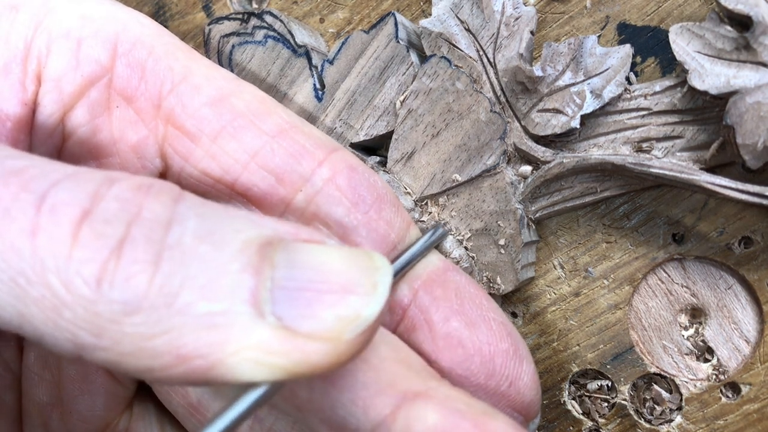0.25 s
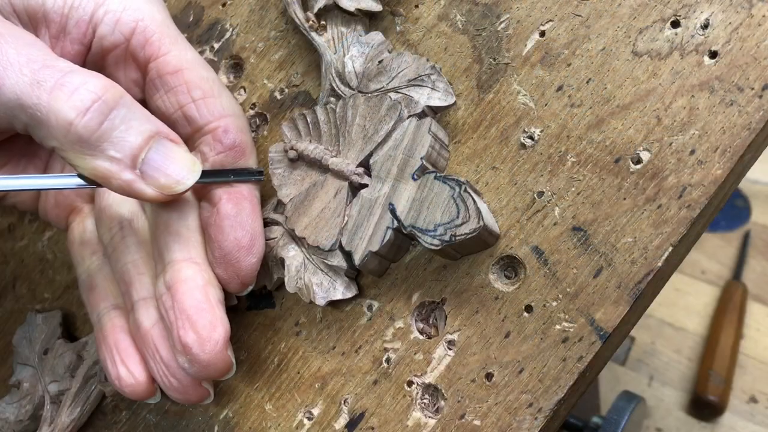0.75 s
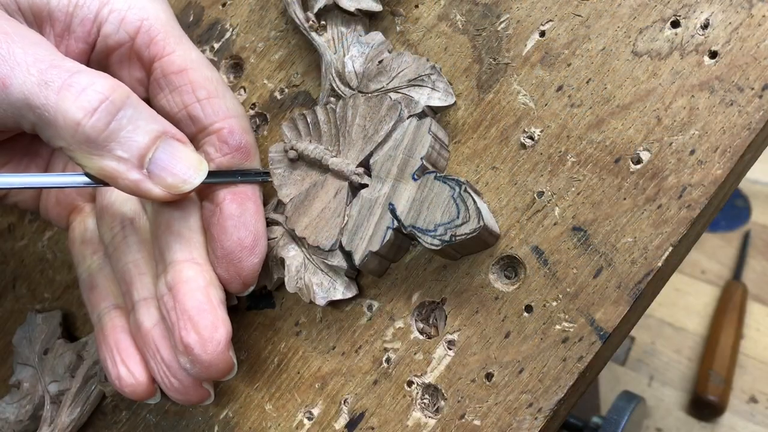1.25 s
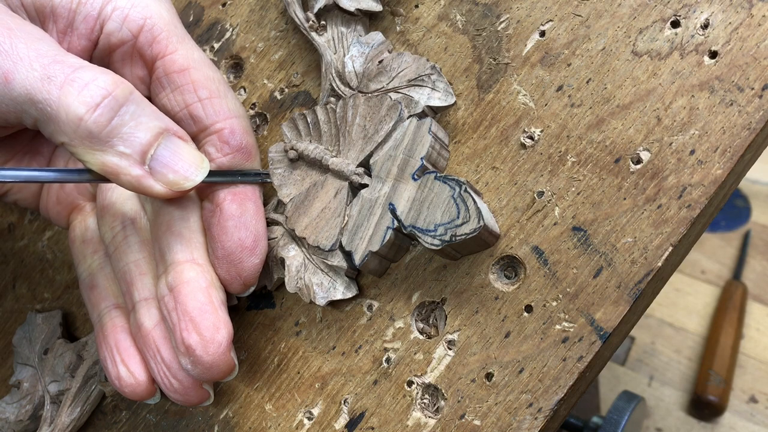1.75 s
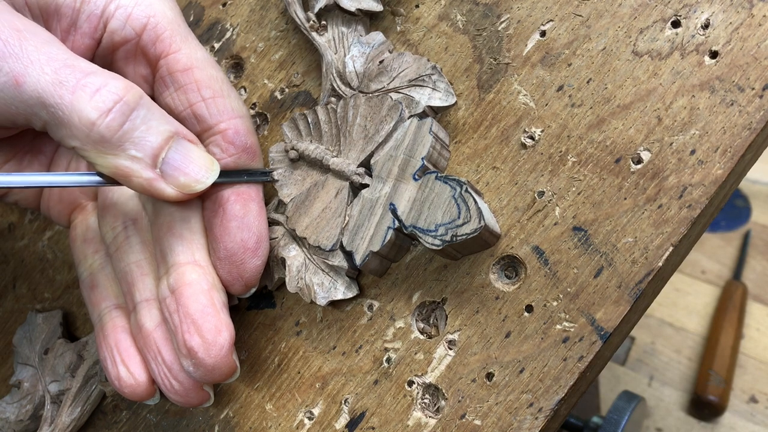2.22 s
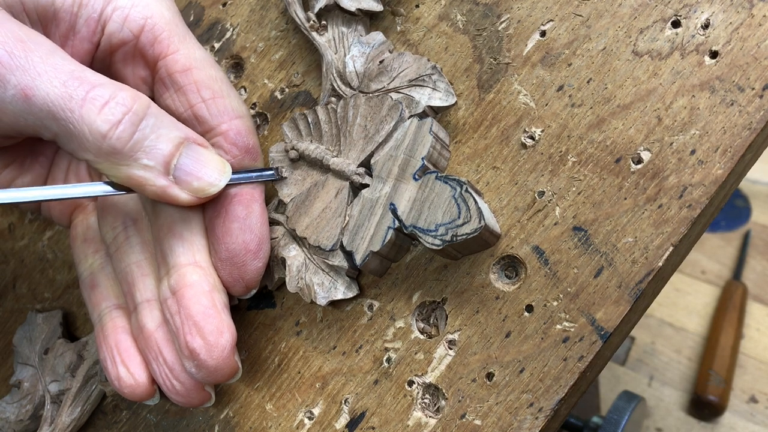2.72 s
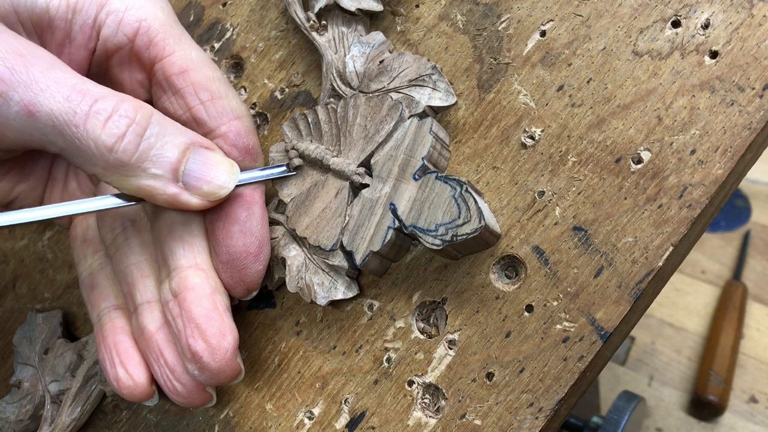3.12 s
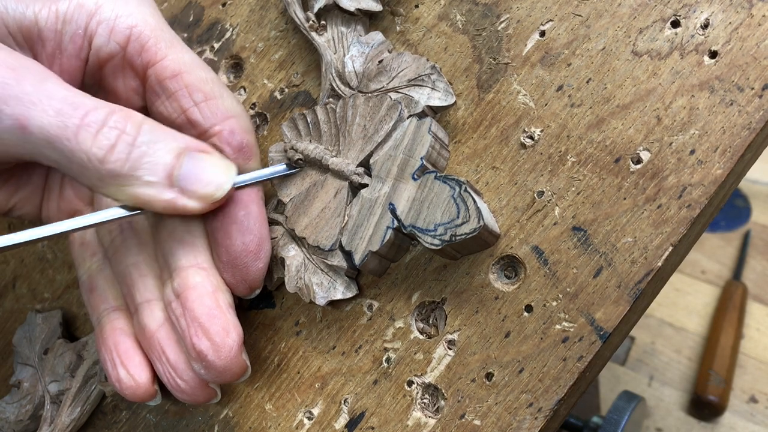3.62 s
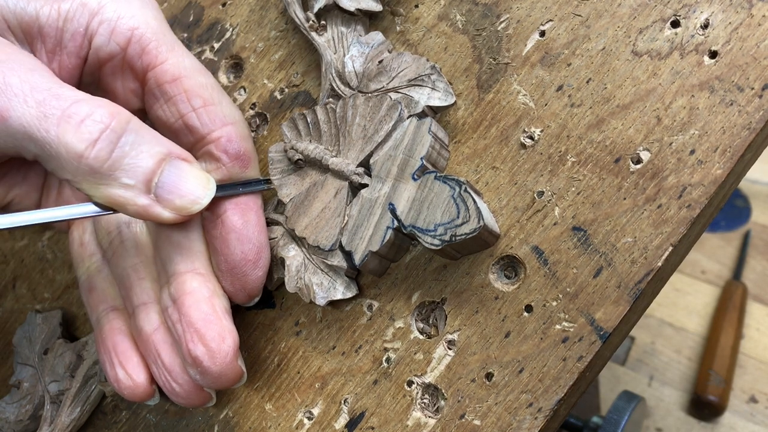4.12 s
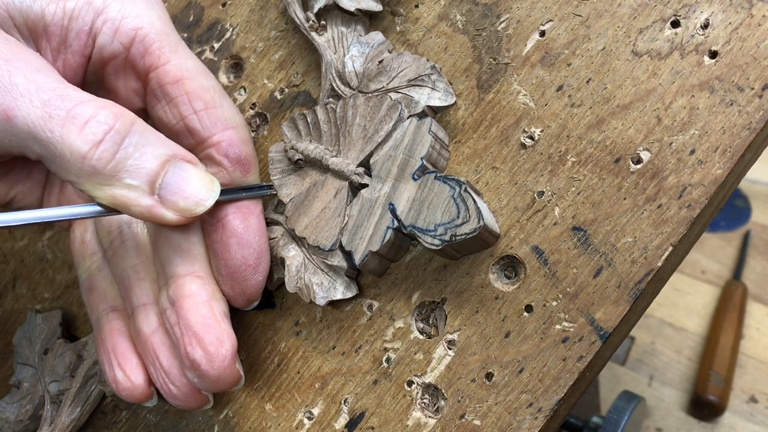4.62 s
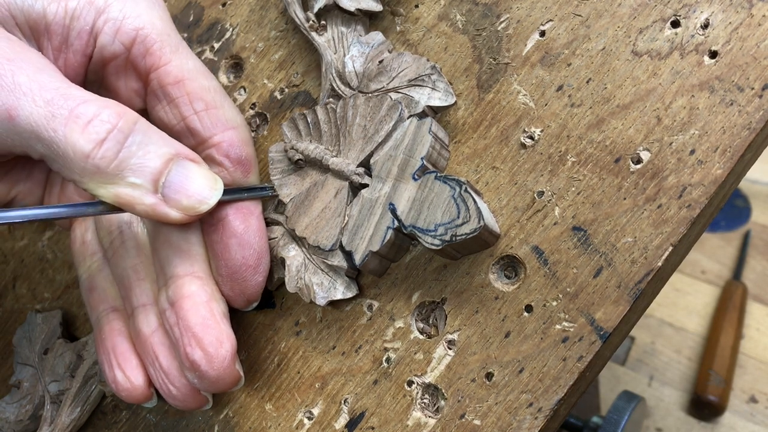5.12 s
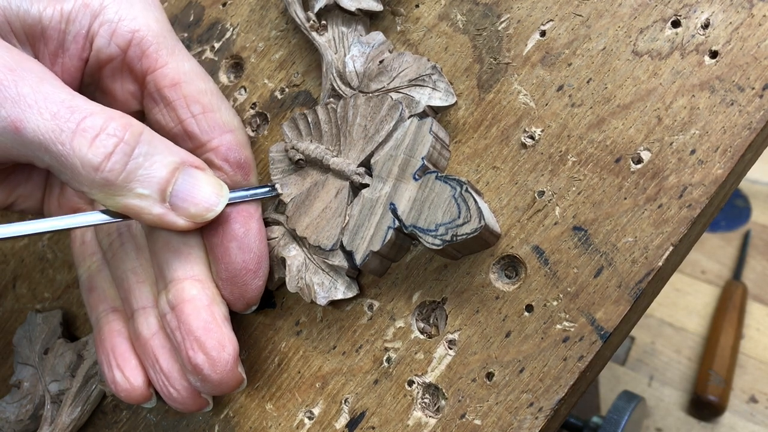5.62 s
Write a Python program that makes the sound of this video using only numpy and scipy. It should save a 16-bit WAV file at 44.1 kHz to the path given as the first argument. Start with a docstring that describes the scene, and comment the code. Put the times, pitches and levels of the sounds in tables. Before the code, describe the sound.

A small hand gouge pares a wood carving on a workbench, heard up close in a quiet workshop. A brief crackling cut opens, then after a pause comes a busy run of tiny snaps and short scrapes, with soft thumps from the bench. After another lull the piece rocks with light hollow knocks and a few more cuts follow. Faint hiss, low rumble and a soft repeating swish lie behind.

```python
"""A quiet workshop: a small gouge pares a walnut carving on a workbench, heard up close.
The edge rasps along the grain, and tiny fibre breaks crackle and ring the wood. When a chip gives way
the carving thumps the bench; between cuts the work rocks and knocks lightly.
Behind it lie a low rumble, hiss and a faint repeating swish."""
import sys
import numpy as np
from scipy import signal
from scipy.fft import rfft, irfft
from scipy.io import wavfile

SR = 44100
rng = np.random.default_rng(int(sys.argv[2]) if len(sys.argv) > 2 else 0)


def store_wav(level_fs):
    """Save 16-bit WAV to argv[1]."""
    pcm = np.round(np.clip(np.atleast_2d(level_fs), -1, 1) * 32767)
    wavfile.write(sys.argv[1], SR, pcm.T.astype(np.int16))


N = 258426
TIME = np.arange(N) / SR
TAPS = 8192
HZ = np.fft.rfftfreq(TAPS, 1 / SR)

# modes of the bench under the carving: f/Hz, level/dB, t60/s
BENCH_MODES = [(58.2, -24.5, 0.83), (75.4, -23, 1), (133.6, -11, 0.3), (177.5, -9.5, 0.14),
               (255, 0.5, 0.0775), (422, -10.5, 0.046)]
# hollow modes of the knocked work: f/Hz, level/dB, t60/s
HOLLOW_MODES = [(447.6, 0.5, 0.028), (584, -4, 0.021), (716, 1.5, 0.026), (1091, -11.5, 0.037)]


def gain_of(db):
    """Decibels to amplitude."""
    return 10 ** (np.asarray(db) / 20)


def unit_rms(x):
    """Scales to rms 1."""
    return x / np.sqrt(np.mean(x ** 2) + 1e-20)


def curve_at(points, hz):
    """Reads a curve on a log-frequency axis."""
    f, value = np.transpose(points)
    return np.interp(np.log(hz + 1), np.log(f), value)


def add(mix, s, sound):
    """Mixes a sound in at s seconds."""
    part = mix[max(round(s * SR), 0):][:len(sound)]
    part += sound[:len(part)]


def noise(colour):
    """Steady noise of a given colour, rms 1."""
    eq = gain_of(curve_at(colour, np.fft.rfftfreq(N, 1 / SR)))
    return unit_rms(irfft(rfft(rng.standard_normal(N)) * eq, N))


def ring(modes, attack_s):
    """Damped modes with a soft attack, neighbours in opposite phase."""
    t = TIME[:2 * TAPS]
    tone = sum((-1) ** k * gain_of(db - 60 * t / t60) * np.sin(2 * np.pi * hz * t)
               for k, (hz, db, t60) in enumerate(modes))
    return tone * (1 - np.exp(-(t / attack_s) ** 2))


def room_tone(air_db=-49.5, rumble_db=-58, ebb_db=5, ebbs_per_s=9):
    """The hiss of still workshop air over a low rumble that swells and ebbs."""
    # colour of the air: f/Hz, level/dB
    air_colour = [(20, -53.5), (36, -22), (56, -4), (100, 0), (160, -3), (280, -15.5), (480, -22.5),
                  (700, -24), (950, -28.5), (1900, -30.5), (3000, -32), (6000, -32.5), (10000, -38.5),
                  (15800, -39.5)]
    # the air's level dips briefly: t/s, level/dB
    air_dip = [(.2, -0.5), (.52, -3.5), (.8, 0)]
    # colour of the rumble: f/Hz, level/dB
    rumble_colour = [(60, -36), (130, 5), (190, -3.5), (300, -4), (450, -21.5), (1000, -70), (4000, -87)]
    air = gain_of(air_db + np.interp(TIME, *np.transpose(air_dip))) * noise(air_colour)
    wander = np.interp(TIME * ebbs_per_s, np.arange(TAPS), rng.uniform(-2.6, 2.4, TAPS))
    ebb = unit_rms(gain_of(ebb_db * wander))
    return air + gain_of(rumble_db) * ebb * noise(rumble_colour)


def fibre_click(tilt, contact_db=1.85):
    """One snapping fibre rings the carving; each point of contact favours other resonances."""
    # broad colour of breaking fibres: f/Hz, level/dB
    fibre_colour = [(60, -6), (200, -12), (350, -4.5), (650, -1), (900, -10), (1300, -10), (1600, -6),
                    (2800, -3.5), (4300, -10), (6500, -14.5), (9000, -21), (12000, -26), (16000, -27)]
    # resonances of carving and blade: f/Hz, width/Hz, height/dB
    resonances = [(432, 16, 9), (569, 23, 9.5), (729, 56, 12), (1085, 72, 14.5), (1466, 244, 9.5),
                  (1613, 107, 8.5), (1738, 55, 5.5), (2022, 36, 9), (2267, 29, 5), (2393, 79, 7.5),
                  (2600, 200, 7.5), (2940, 100, 1), (3223, 67, 5.5), (3910, 490, 9.5), (4420, 270, 5),
                  (4920, 430, 6), (5990, 480, 9.5), (6860, 63, 1.5), (7210, 290, 9.5), (7630, 230, 3)]
    favour = contact_db * rng.standard_normal(len(resonances))
    peaks = sum((db + extra) / (1 + (2 * (HZ - hz) / width) ** 2)
                for (hz, width, db), extra in zip(resonances, favour))
    octaves = np.log2(np.maximum(HZ, 600) / 3000)
    log_gain = np.log(gain_of(curve_at(fibre_colour, HZ) + peaks + tilt * octaves))
    # minimum phase: the wood rings only after the break
    log_spectrum = np.conj(signal.hilbert(np.r_[log_gain, log_gain[-2:0:-1]]))
    return np.fft.ifft(np.exp(log_spectrum)).real[:TAPS]


def crackle(force, tilt, fizz_db, breaks_per_s, spread_db=2, rub=0.27):
    """Tiny fibre breaks and smooth rubbing follow the force and ring the wood."""
    count = len(force)
    snaps = rng.random(count) < breaks_per_s / SR
    sizes = gain_of(spread_db * np.minimum(rng.exponential(1, count), 4))
    breaks = unit_rms(snaps * sizes * rng.choice([-1, 1], count))
    drive = force * (breaks + rub * rng.standard_normal(count))
    sound = signal.fftconvolve(drive, fibre_click(tilt))
    sound *= np.linalg.norm(force) / np.linalg.norm(sound)  # the force sets the energy released
    # where the force is highest, tearing fibres also fizz straight into the air
    treble = signal.butter(2, [7000, 14000], "band", fs=SR, output="sos")
    fizz = signal.sosfilt(treble, rng.standard_normal(count) * force ** 2 / force.max())
    add(sound, 0, gain_of(fizz_db) * fizz)
    return sound


def scrapes(trim_db=-3, catch_db=2.5, catches_per_s=260):
    """The sliding edge catches unevenly on the grain; carving and bench shudder under it."""
    # slides of the edge: start/s, end/s, level/dB, tilt/(dB per octave)
    slides = [ (0, 0.035, -44.5, -0.5), (0.022, 0.045, -38, -1.5), (.268, 0.281, -57.5, 2),
              (2.059, 2.076, -43, -2.5), (2.176, 2.197, -39.5, -0.5), (2.506, 2.531, -41, -1.5),
              (2.979, 2.989, -43, -3), (3.302, 3.393, -40.5, -1), (3.552, 3.706, -58, -2.5),
              (5.208, 5.44, -55.5, -13), (5.55, 5.564, -38.5, -2), (5.729, 5.757, -41, -2.5),
              (5.775, 5.86, -37.5, -1.5)]
    attack_s, slacken_db_per_s, release_s = 0.0017, 24, 0.0077
    out = np.zeros(N)
    bench, hollow = ring(BENCH_MODES, attack_s=0.00176), ring(HOLLOW_MODES, attack_s=0.0028)
    body = gain_of(-6) * bench / np.linalg.norm(bench) + gain_of(-8) * hollow / np.linalg.norm(hollow)
    grain = np.interp(TIME * catches_per_s, np.arange(TAPS), rng.standard_normal(TAPS))
    for start, end, db, tilt in slides:
        t = np.arange(0, end - start + 4 * release_s, 1 / SR)
        catching = unit_rms(gain_of(catch_db * np.resize(grain[round(start * SR):], len(t))))
        stroke = np.minimum(t / attack_s, 1) * np.exp(-np.maximum(start + t - end, 0) / release_s)
        force = gain_of(db + trim_db - slacken_db_per_s * t) * stroke * catching
        fizz_db = -9.5 + 5 * tilt  # a brighter slide fizzes more
        add(out, start, room(crackle(force, tilt, fizz_db, breaks_per_s=4000)))
        shudder = signal.fftconvolve(force * rng.standard_normal(len(t)), body)
        add(out, start, room(shudder))
    return out


def chips(crackle_trim_db=-2, thump_trim_db=1, creep_db=-21.5, thump_lag_s=0.00062):
    """The edge creeps in, fibres tear ever harder, the chip snaps, and carving and bench take the jolt."""
    # chips giving way: t/s, crackle/dB, build-up/s, decay/s, thump/dB
    snaps = [ (0.038, -30.5, .004, .0015, -34.5), (.053, -29, .003, 0.0019, -27.5),
             (.252, -48, 0.0018, 0.00083, -66), (1.343, -51, 0.0023, 0.0036, -72),
             (1.971, -28.5, .0014, 0.0014, -29.5), (2.08, -26, 0.0028, 0.0024, -25),
             (2.324, -31.5, 0.0033, 0.0036, -30.5), (2.397, -48.5, 0.0024, .002, -59),
             (2.495, -28.5, 0.0023, 0.0044, -28.5), (2.5375, -27, .003, 0.0061, -44),
             (2.7327, -25, .001, 0.0045, -27.5), (2.749, -31.5, 0.0021, 0.0056, -32.5),
             (2.819, -21.5, 0.00053, 0.0037, -21.5), (2.84, -28, .003, 0.0098, -30.5),
             (2.9888, -19.5, 0.00076, 0.0024, -19), (3.106, -26, .0016, 0.0052, -23.5),
             (3.2041, -31.5, .0013, 0.012, -37.5), (3.2836, -18, 0.0015, 0.0027, -27.5),
             (3.318, -35.5, 0.0016, 0.0037, -47), (5.799, -25.5, 0.00099, 0.0044, -40),
             (5.824, -25, 0.00091, 0.002, -33), (5.851, -30, .002, .0055, -27.5)]
    out = np.zeros(N)
    jolt = gain_of(-18) * ring(HOLLOW_MODES, attack_s=0.00072) - ring(BENCH_MODES, attack_s=0.0033)
    for s, db, rise_s, fall_s, thump_db in snaps:
        creep_s = 5 * rise_s
        t = np.arange(-2 * creep_s, 6 * fall_s, 1 / SR)
        before, after = np.minimum(t, 0), np.maximum(t, 0)
        build_up = np.maximum(np.exp(before / rise_s), gain_of(creep_db) * np.exp(before / creep_s))
        force = gain_of(db + crackle_trim_db) * build_up * np.exp(-after / fall_s)
        tilt = 0.01 * (db + 26.5)  # a harder break is a touch brighter
        fizz_db = -12.5 + 8 * np.log2(rise_s / fall_s)  # a slow tear with a quick release fizzes most
        add(out, s + t[0], room(crackle(force, tilt, fizz_db, breaks_per_s=11000)))
        add(out, s + thump_lag_s, room(gain_of(thump_db + thump_trim_db) * jolt))
    return out


def swishes(steady_from_s=0.781, period_s=0.3632, width_s=0.03, trim_db=-5):
    """A soft, distant swish of noise that comes round almost three times a second."""
    # colour of the swish: f/Hz, level/dB
    swish_colour = [(120, -18), (260, 3), (400, -8), (560, -14), (720, 7), (950, -25), (1500, -9),
                    (1740, 2), (1870, -3), (2000, -5), (2200, -16), (5000, -27)]
    # louder swishes ahead of the steady pulse: t/s, level/dB
    opening = [(.275, -51.5), (.42, -51.5)]
    steady = [(s, -57.5) for s in np.arange(steady_from_s, N / SR, period_s)]
    swell = sum(gain_of(db + trim_db) * np.exp(-((TIME - s) / width_s) ** 2)
                for s, db in opening + steady)
    return swell * noise(swish_colour)


def knocks(trim_db=-2, thud_db=-11, detune=0.04):
    """The work rocks: a hollow knock of varying pitch, a bench thud and, on hard contact, a tick."""
    # light contacts: t/s, knock/dB, tick/dB
    contacts = [ (2.044, -34, -50.5), (2.259, -35.5, -56), (2.307, -36, -44.5), (2.628, -30, -49.5),
                (5.215, -38, -66), (5.2585, -37, -49.5), (5.285, -36, -46.5), (5.333, -34, -57),
                (5.3799, -32, -43), (5.4357, -32, -57), (5.688, -40.5, -54)]
    # modes of the hard tick: f/Hz, level/dB, t60/s
    tick_modes = [(1545, 1, 0.031), (2120, 8, 0.0054), (2306, 14, 0.0076), (3660, -2, 0.00756),
                  (5300, -1, 0.012)]
    out = np.zeros(N)
    thud = ring(BENCH_MODES, attack_s=0.0025)
    for s, knock_db, tick_db in contacts:
        repitch = [1 + detune * rng.standard_normal(), 1, 1]
        hollow = ring(np.multiply(HOLLOW_MODES, repitch), attack_s=0.0012)
        tick = ring(np.multiply(tick_modes, repitch), attack_s=0.00031)
        knock = gain_of(trim_db) * hollow + gain_of(thud_db) * thud
        add(out, s, room(gain_of(knock_db) * knock + gain_of(tick_db + trim_db) * tick))
    return out


def room(x, scatter_db=-7, scatter_s=0.0088, tail_attack_s=0.00073):
    """Adds scatter off the bench and the moving hands, then the short tail of the workshop."""
    # decay of the tail: f/Hz, t60/s
    tail_decay = [(120, 2.36), (300, 0.34), (650, 0.22), (2500, 0.35), (6000, 0.2), (14000, 0.3)]
    # colour of the tail: f/Hz, level/dB
    tail_colour = [(120, -4.5), (300, -10.5), (560, -4), (1000, -12), (2000, -21), (5000, -15), (14000, -8)]
    t = TIME[:SR // 2]
    hz, frame_s, bands = signal.stft(rng.standard_normal(len(t)), SR, nperseg=256)
    t60 = curve_at(tail_decay, hz)[:, None]
    unit_energy = np.sqrt(2 * np.log(1000) / (t60 * SR))
    bands *= gain_of(curve_at(tail_colour, hz)[:, None] - 60 * frame_s / t60) * unit_energy
    tail = signal.istft(bands, SR, nperseg=256)[1][:len(t)] * (1 - np.exp(-(t / tail_attack_s) ** 2))
    scatter = rng.standard_normal(len(t)) * t * np.exp(-2 * t / scatter_s)
    mids = signal.butter(2, [1000, 4500], "band", fs=SR, output="sos")
    response = tail + gain_of(scatter_db) * signal.sosfilt(mids, scatter / np.linalg.norm(scatter))
    response[0] += 1  # the direct sound
    return signal.fftconvolve(x, response)


def scene():
    """The carving up front, room tone and swish behind, in mono."""
    return (chips() + scrapes() + knocks() + room_tone() + swishes())[None]


def record(dry):
    """A steep high cut at 16 kHz."""
    high_cut = signal.firwin(511, 16000, window=("kaiser", 9), fs=SR)
    return signal.oaconvolve(dry, high_cut[None], "same")


dry = scene()
out = record(dry)
store_wav(out)
```